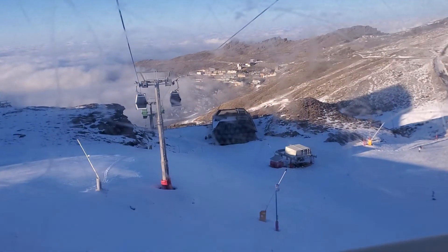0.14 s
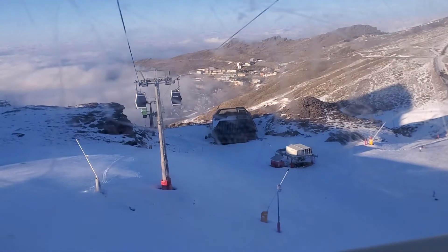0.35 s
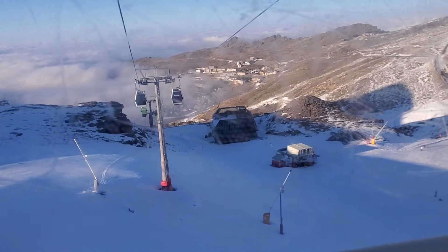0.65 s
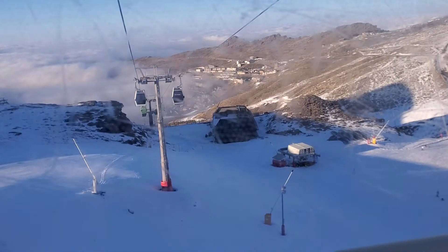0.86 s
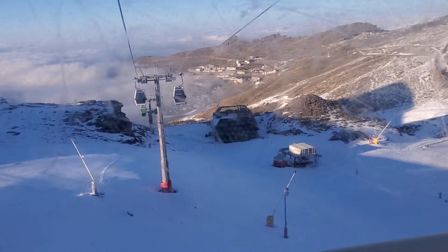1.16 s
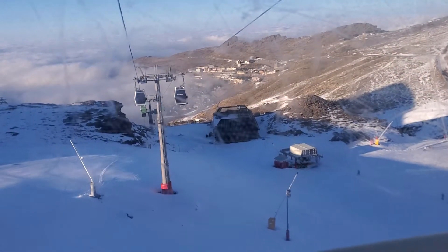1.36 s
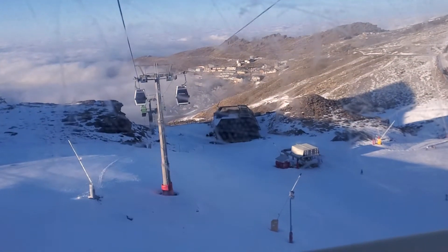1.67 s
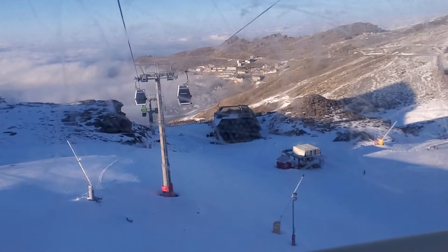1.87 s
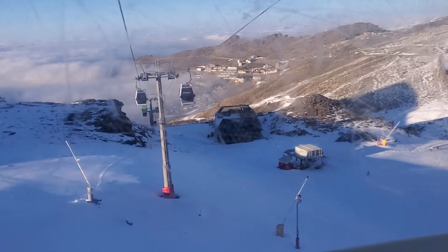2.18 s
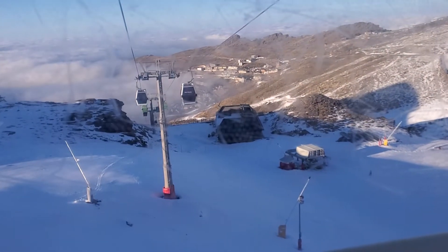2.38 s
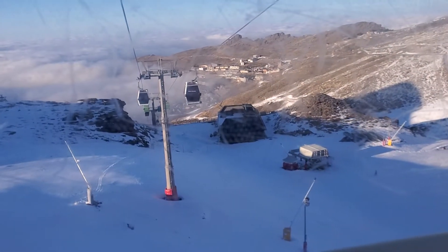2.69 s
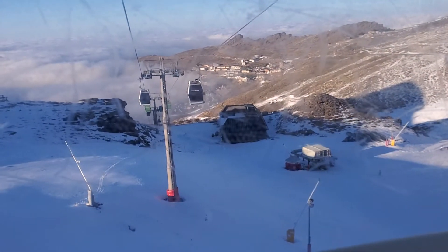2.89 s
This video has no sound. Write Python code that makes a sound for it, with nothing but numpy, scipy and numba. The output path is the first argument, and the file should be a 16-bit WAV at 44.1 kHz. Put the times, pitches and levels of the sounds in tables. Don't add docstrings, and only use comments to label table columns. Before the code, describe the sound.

A low, uneven cable-car drone around 80 Hz throbs throughout inside a small hard-walled cabin, over faint wind and slowly rising hiss. Winter cloth rustles continuously, with a soft airy swish at 0.2-0.7 s. Light ticks and creases lead to a dull boot knock on the floor at 1.5 s. Deep hull booms follow near 1.7 and 2.4 s; brighter sleeve rubbing swells from 2.6 to 2.95 s.

```python
import sys
import numpy as np
from scipy import signal
from scipy.fft import rfft, irfft
from scipy.io import wavfile
from scipy.ndimage import uniform_filter1d
from numba import njit

SR = 44100
rng = np.random.default_rng(int(sys.argv[2]) if len(sys.argv) > 2 else 0)


def gain_from_db(level_db):
    decades = np.asarray(level_db, float) / 20
    return 10 ** decades


def digitize_waveform(pressure):
    field = np.atleast_2d(pressure).T
    bounded = np.clip(field, -1, 1)
    quanta = np.round(bounded * 32767).astype(np.int16)
    wavfile.write(sys.argv[1], SR, quanta)


N = 133623
GRIT_DB = 2.5


def unit(x):
    return x / np.sqrt(np.mean(x ** 2))


def at_hz(table, hz):
    a = np.array(table, float)
    return np.interp(np.log(np.maximum(hz, 1)), np.log(np.maximum(a[:, 0], 1)), a[:, 1])


def curve(table, column):
    a = np.array(table, float)
    return np.interp(np.arange(N) / SR, a[:, 0], a[:, column])


@njit
def svf(x, hz, width_hz):
    y, band_state, low_state = np.empty(len(x)), 0., 0.
    for i in range(len(x)):
        g = np.tan(np.pi * hz[i] / SR)
        k = width_hz[i] / hz[i]
        v = (band_state + g * (x[i] - low_state)) / (1 + g * (g + k))
        band_state = 2 * v - band_state
        low_state = low_state + 2 * g * v
        y[i] = k * v
    return y


def band(x, hz, width_hz):
    hz = np.clip(hz + np.zeros(x.shape[1]), 10, .45 * SR)
    width_hz = np.maximum(width_hz + np.zeros(x.shape[1]), 2)
    return np.array([svf(svf(row, hz, width_hz), hz, width_hz) for row in x])


def walk(rate_hz):
    hold = int(SR / rate_hz)
    steps = np.repeat(rng.standard_normal(N // hold + 1), hold)
    return 1.52 * uniform_filter1d(uniform_filter1d(steps, hold), hold)[:N]


def fibres(grit_db):
    return rng.standard_normal((2, N)) * gain_from_db(grit_db * rng.exponential(size=N))


def coloured(x, table, shared_db, flicker_db):
    hz, out = np.fft.rfftfreq(N, 1 / SR), 0
    spec = rfft(x) * gain_from_db(at_hz(table, hz)) * (hz > table[0][0])
    for centre_oct in np.arange(7, 14.5, .5):
        share = np.clip(1 - 2 * np.abs(np.log2(hz + 1) - centre_oct), 0, 1)
        out = out + irfft(spec * share, N) * gain_from_db(shared_db + flicker_db * walk(8.99))
    return unit(out)


def swell(start_s, length_s, rise, fall):
    u = (np.arange(N) / SR - start_s) / length_s
    return np.sin(np.pi / 2 * np.clip(np.minimum(u / rise, (1 - u) / fall), 0, 1)) ** 2


def ring(start_s, hz, t60_s, rise_s):
    t = np.maximum(np.arange(N) / SR - start_s, 0)
    decay = np.exp(-np.log(1000) * t / t60_s)
    return np.sin(2 * np.pi * hz * t) * decay * (1 - np.exp(-t / rise_s))


def drone():
    # [centre t/s, length/s, level/dB, f/Hz]
    strand_throbs = [(.01, 0.061, -25.5, 84), (0.167, 0.28, -29.5, 81.1), (0.338, .22, -27.5, 78.8),
                     (0.488, 0.084, -31, 81.06), (0.63, 0.096, -31.5, 104), (0.634, 0.16, -36, 78),
                     (0.795, 0.19, -39, 96), (1.01, 0.2, -35, 88.1), (1.126, 0.17, -36, 75),
                     (1.242, 0.15, -38, 81.8), (1.537, 0.26, -34, 76.14), (1.648, 0.13, -35, 76.5),
                     (1.813, 0.15, -34, 91.74), (1.922, 0.056, -27.5, 84), (2.07, 0.43, -34, 79.27),
                     (2.215, 0.099, -31, 92.46), (2.314, 0.069, -30, 84), (2.39, 0.088, -28.5, 91.2),
                     (2.502, 0.21, -30.5, 79), (2.598, 0.085, -31.5, 108), (2.645, 0.058, -30, 79.8),
                     (2.808, 0.095, -31, 77.5), (2.914, 0.081, -25.5, 77.5), (2.976, 0.063, -28, 87.5),
                     (0.542, 0.047, -33, 85.3), (0.332, 0.069, -48, 147.6), (0.614, 0.089, -43, 143.2),
                     (1.545, .06, -45.5, 149.3), (1.942, 0.098, -40.5, 146), (2.569, 0.081, -40.5, 147),
                     (2.814, 0.094, -42, 150), (2.944, 0.075, -41, 140.3), (0.238, .1, -45.5, 244),
                     (2.835, .05, -47, 274), (1.684, 0.064, -37, 40)]
    # [f/Hz, width/Hz, level/dB]
    air_modes = [(34, 27, -45.5), (53.9, 18.5, -44), (84, 13, -42.5), (109.3, 16.4, -43.5),
                 (145.6, 21, -52.5), (190, 21.6, -54), (221.9, 15.3, -55.5), (270.4, 16.3, -53),
                 (333, 36, -58.5), (404.6, 28, -66)]
    t, push = np.arange(N) / SR, rng.standard_normal((2, N))
    out = 0
    for centre_s, length_s, db, hz in strand_throbs:
        envelope = swell(centre_s - length_s / 2, length_s, 0.26, 0.46)
        phase_rad = rng.uniform(0, 2 * np.pi)
        out = out + np.sqrt(2) * gain_from_db(db) * envelope * np.sin(2 * np.pi * hz * t + phase_rad)
    climb_db = 1.5 * (t - 1.5)
    for hz, width_hz, db in air_modes:
        out = out + gain_from_db(db + climb_db + 1.45 * walk(6.67)) * unit(band(push, hz, width_hz))
    return out


def booms():
    # [start t/s, length/s, level/dB, f/Hz]
    jolts = [(0.106, 0.18, -41, 34), (1.002, 0.34, -47, 31), (1.371, 0.073, -37, 36),
             (1.473, 0.12, -34, 34), (1.722, 0.19, -19.5, 31.7), (1.786, 0.07, -26.5, 32),
             (1.935, 0.26, -31.5, 31.6), (0.452, .12, -44, 32), (1.6, 0.1, -39, 30),
             (2.197, .17, -34, 28.2), (2.429, .25, -25, 31.8), (2.801, 0.1, -34, 32.3),
             (2.886, 0.13, -32, 34)]
    t, sway, out = np.arange(N) / SR, gain_from_db(.8 * walk(14)), 0
    for start_s, length_s, db, hz in jolts:
        envelope = swell(start_s, length_s, 0.17, 0.21) * sway
        out = out - np.sqrt(2) * gain_from_db(db) * envelope * np.sin(2 * np.pi * hz * (t - start_s))
    return out


def rustle():
    # [t/s, level/dB]
    stir = [(0, -55.5), (.32, -54), (.46, -52.5), (.6, -52.5), (.85, -51.5), (.97, -52.5), (1.25, -53),
            (1.37, -45), (1.47, -50), (1.6, -55), (1.88, -54), (1.95, -49.5), (2.34, -52.5), (2.52, -50),
            (2.57, -46.5), (2.7, -43.5), (2.85, -51), (2.98, -46)]
    # [f/Hz, density/dB per Hz]
    cloth = [(120, -14), (200, -8), (377, -3.5), (404, -2.5), (735, -7.5), (1070, -10), (1400, -12),
             (3100, -16.5), (12000, -31), (15600, -84), (22000, -120)]
    shared_db = 1.2 * walk(24.71)
    return coloured(fibres(GRIT_DB), cloth, shared_db, flicker_db=1.5) * gain_from_db(curve(stir, 1) + 5)


def creases():
    # [start t/s, length/s, level/dB, centre f/Hz, width/Hz]
    crumples = [(1.053, .03, -54.5, 2900, 1100), (1.285, 0.051, -54, 3340, 1000),
                (1.356, 0.019, -48, 1600, 3000), (1.422, .012, -50, 7900, 12000),
                (1.484, 0.047, -40, 1400, 4900), (1.49, 0.014, -41.5, 770, 820),
                (.85, 0.044, -56, 3000, 1200), (0.31, 0.074, -54, 1240, 370), (2.95, .04, -46.5, 1030, 580),
                (2.755, .025, -54, 9100, 1400), (.52, 0.083, -47.5, 550, 270), (2.54, 0.025, -42, 740, 620),
                (2.865, .03, -44, 530, 500), (1.492, 0.043, -55, 6500, 9100), (1.487, 0.05, -35, 270, 350),
                (0.21, 0.13, -55.5, 3300, 1600), (2.55, 0.1, -69, 2920, 1200),
                (2.657, 0.14, -52.5, 9200, 3900), (1.507, 0.043, -43, 480, 510),
                (1.769, 0.029, -51, 2700, 9300), (1.893, 0.052, -46, 706, 900),
                (1.983, 0.036, -45, 4060, 7400), (2.138, 0.032, -48.5, 6500, 3000),
                (1.25, .06, -47, 310, 200), (1.43, 0.056, -50, 650, 180), (1.09, 0.13, -60, 10800, 5000),
                (2.147, 0.01, -46, 9100, 14000), (2.94, 0.047, -50.5, 1700, 1900)]
    x, rag, out = fibres(2.3), gain_from_db(2.5 * walk(150)), 0
    for start_s, length_s, db, hz, width_hz in crumples:
        envelope = swell(start_s, 1.84 * length_s, .3, 0.73)
        out = out + gain_from_db(db) * unit(band(x, hz, width_hz)) * envelope
    return rag * out


def swishes():
    # [t/s, level/dB, centre f/Hz, width/Hz]
    sleeves = [
        [(.15, -64, 5000, 3000), (.24, -57, 4930, 4000), (.3, -50, 4960, 4000), (.37, -51.5, 5300, 3500),
         (.44, -53, 5300, 3000), (.6, -65, 5040, 2000), (.75, -58, 5000, 2000)],
        [(.15, -66, 5580, 400), (.2, -59, 5450, 400), (.35, -51.5, 5460, 450), (.5, -55, 5600, 350),
         (.68, -54.5, 5500, 400), (.78, -63, 5600, 500)],
        [(2.68, -62, 7000, 900), (2.72, -49, 6900, 900), (2.78, -53, 6700, 900), (2.84, -49, 7100, 1100),
         (2.91, -52, 6840, 900), (2.95, -60, 6800, 900)],
        [(2.6, -59, 8460, 3020), (2.69, -50, 7700, 3000), (2.76, -45, 6700, 3500), (2.82, -45, 5950, 2800),
         (2.87, -39.5, 5670, 1910), (2.92, -45.5, 5400, 1800), (2.95, -53, 5500, 1530), (3.0, -77, 5000, 1500)],
    ]
    out, t = 0, np.arange(N) / SR
    for rows in sleeves:
        hz = curve(rows, 2) * (1 + 0.016 * walk(40))
        slide = unit(band(fibres(GRIT_DB), hz, curve(rows, 3)))
        level_db = curve(rows, 1) - 0.5 * walk(60)
        out = out + slide * gain_from_db(level_db) * (t > rows[0][0]) * (t < rows[-1][0])
    return out


def knock():
    # [f/Hz, level/dB, t60/s]
    panel = [(186, -31.5, 0.46), (219.6, -30.5, 0.22), (272, -39, .2), (348, -39, 0.164), (433, -45, 0.1),
             (576, -30.5, 0.095), (645, -41, 0.1)]
    start_s, rise_s, out = 1.497, .004, 0
    for hz, db, t60_s in panel:
        second = ring(start_s + .02, 1.01 * hz, t60_s, rise_s)
        out = out + gain_from_db(db) * (ring(start_s, hz, t60_s, rise_s) + 1.22 * second)
    return out


def ticks():
    # [t/s, peak/dB, ring f/Hz]
    clicks = [(0.861, -40, 2560), (1.069, -39, 2820), (1.3493, -27, 2700), (1.492, -30, 2870),
              (1.4975, -25, 2720), (1.994, -28, 2620), (.0745, -46, 12300), (1.4311, -41, 11800),
              (2.1525, -42, 11500), (2.152, -36, 15050), (2.152, -38, 6600)]
    t60_s, rise_s, out = .007, .0005, 0
    for start_s, db, hz in clicks:
        lower = ring(start_s, 0.75 * hz, t60_s, rise_s)
        out = out + gain_from_db(db + 2) * (ring(start_s, hz, t60_s, rise_s) + 0.63 * lower)
    return out


def cabin(x):
    t60_s, tail_db = .07, -7
    t = np.arange(SR // 4) / SR
    tail = rng.standard_normal((2, len(t))) * np.exp(-np.log(1000) * t / t60_s)
    tail = signal.sosfilt(signal.butter(2, 1500, "high", fs=SR, output="sos"), tail)
    tail = tail / np.sqrt(np.sum(tail ** 2, axis=1, keepdims=True))
    wet = gain_from_db(tail_db) * signal.fftconvolve(x, tail, axes=1)[:, :N]
    return (x + wet) / np.sqrt(1 + gain_from_db(2 * tail_db))


def floor():
    # [f/Hz, density/dB per Hz]
    floor_colour = [(150, 1), (264, -7), (589, -24), (1560, -28), (2870, -23.5), (7040, -20), (9440, -27.5),
                    (16000, -47)]
    level_db = -52 + 1.75 * (np.arange(N) / SR - 1.0)
    return coloured(rng.standard_normal((2, N)), floor_colour, 0, 1.0) * gain_from_db(level_db)


def hiss():
    t = np.arange(N) / SR
    high_pass = signal.butter(4, 10800, "high", fs=SR, output="sos")
    treble = signal.sosfilt(high_pass, rng.standard_normal((2, N)))
    creep_db = -7 * np.exp(-t / .5)
    return treble * gain_from_db(-54.5 + creep_db + 1.3 * walk(5) + .7 * walk(20))


def scene():
    # [f/Hz, correlation/1]
    alike = [(40, .993), (70, .998), (150, .96), (290, .7), (640, -.25), (1410, -.45), (3100, -.08),
             (6820, 0)]
    # [f/Hz, left-right/dB]
    tilt = [(100, -1.2), (300, 2), (700, -3.5), (1290, -1), (3300, -5), (3900, -9.5), (8800, -9.5),
            (10800, 0)]
    # [f/Hz, gain/dB]
    body = [(2300, 0), (2850, 5.5), (3200, 3.5), (3700, -0.5), (7900, -2), (8350, -6.5), (9900, -4),
            (11500, -1.5)]
    close = rustle() + creases() + swishes() + ticks() + knock() + floor()
    a, b = rfft(drone() + booms() + cabin(close))
    hz = np.fft.rfftfreq(N, 1 / SR)
    likeness = np.clip(at_hz(alike, hz), -1, 1)
    mid, side = a * np.sqrt((1 + likeness) / 2), b * np.sqrt((1 - likeness) / 2)
    lean = gain_from_db(at_hz(tilt, hz) / 2)
    late = np.exp(-1j * (2 * np.pi * hz * .0002 + .09) * (hz < 300))
    pair = np.array([(mid + side) * lean * late, (mid - side) / lean])
    return irfft(pair * gain_from_db(at_hz(body, hz)), N) + hiss()


def low_pass(x):
    return signal.sosfilt(signal.butter(12, 15790, fs=SR, output="sos"), x)


def record(dry):
    cut = irfft(rfft(dry) * (np.fft.rfftfreq(N, 1 / SR) < 15790), N)
    return low_pass(cut)


dry = scene()
out = record(dry)
digitize_waveform(out)
```